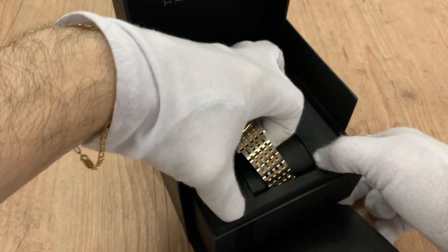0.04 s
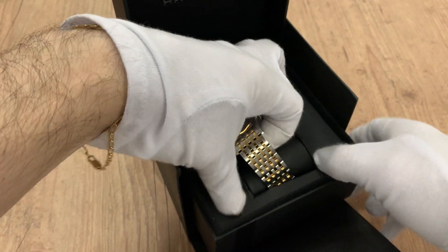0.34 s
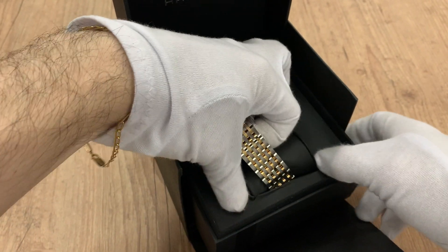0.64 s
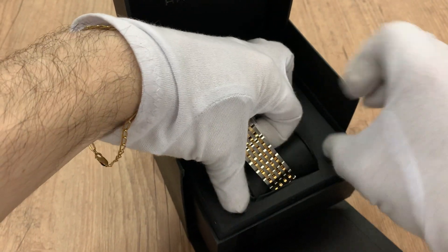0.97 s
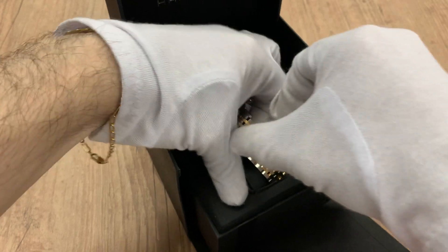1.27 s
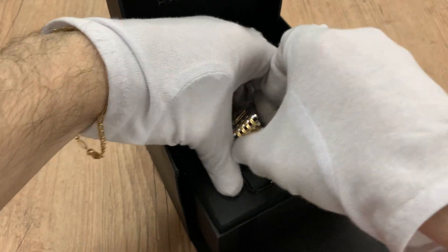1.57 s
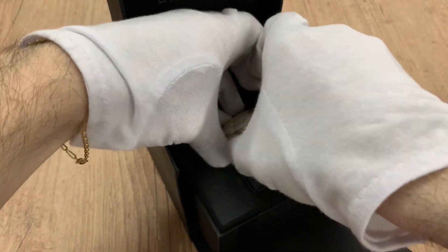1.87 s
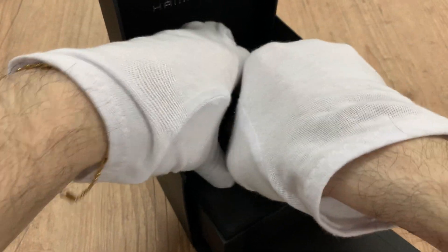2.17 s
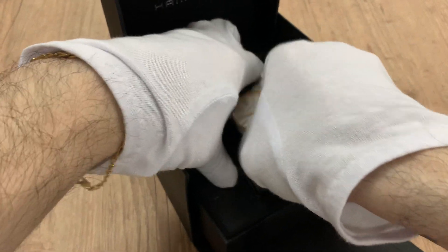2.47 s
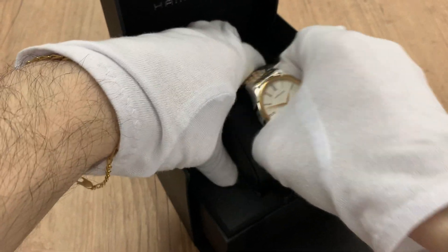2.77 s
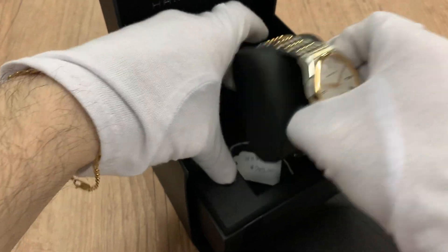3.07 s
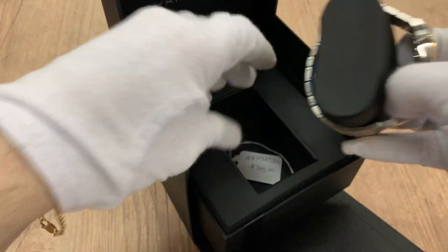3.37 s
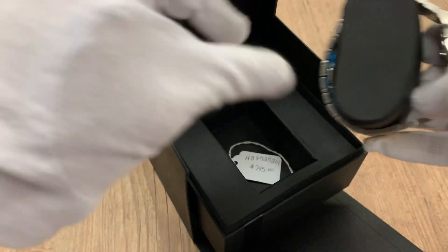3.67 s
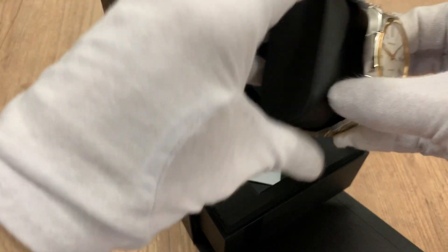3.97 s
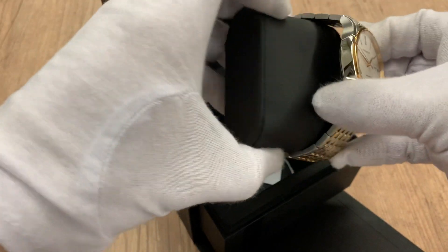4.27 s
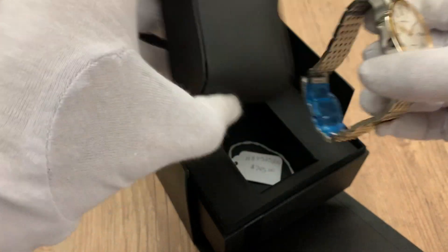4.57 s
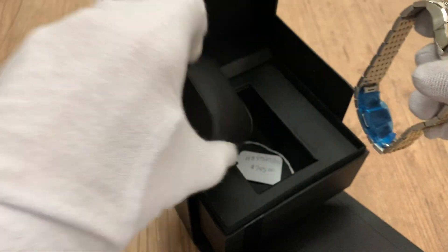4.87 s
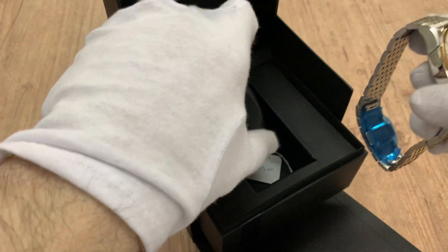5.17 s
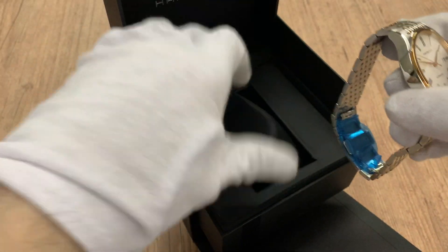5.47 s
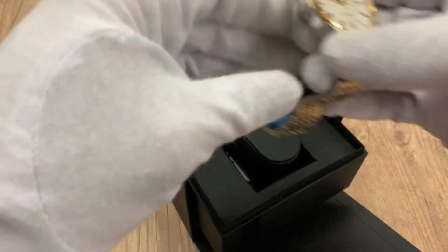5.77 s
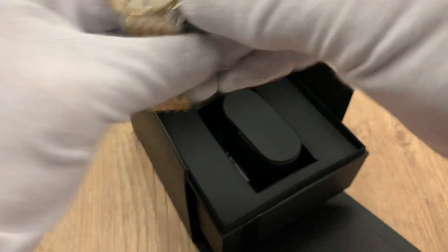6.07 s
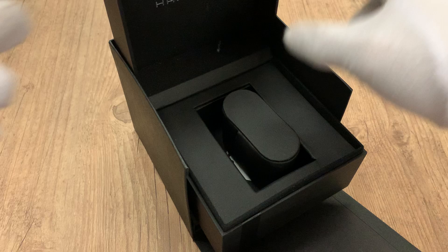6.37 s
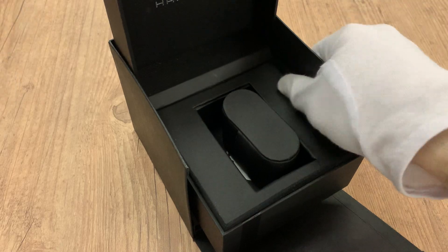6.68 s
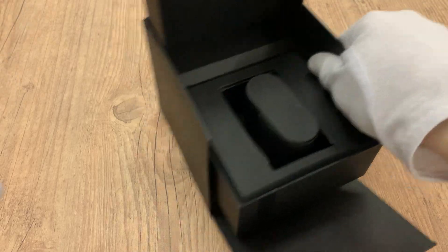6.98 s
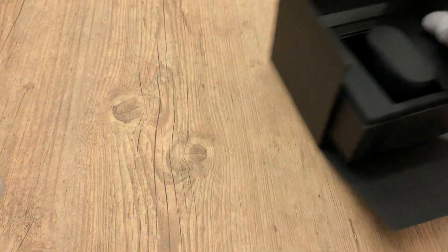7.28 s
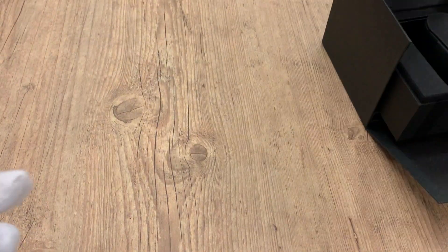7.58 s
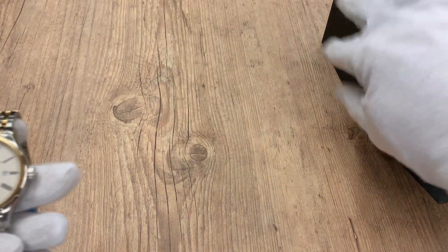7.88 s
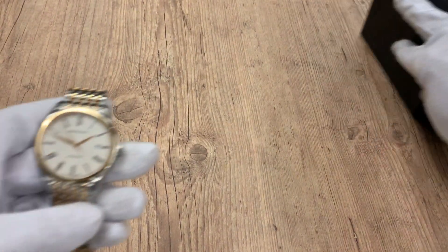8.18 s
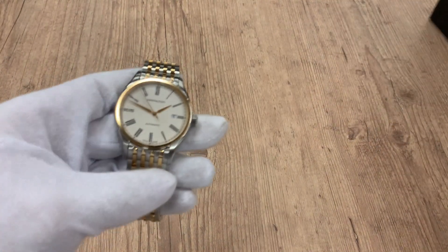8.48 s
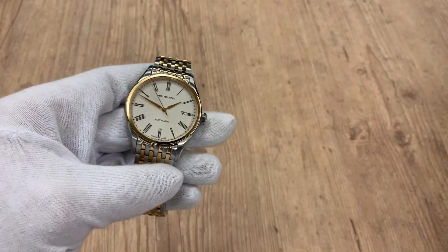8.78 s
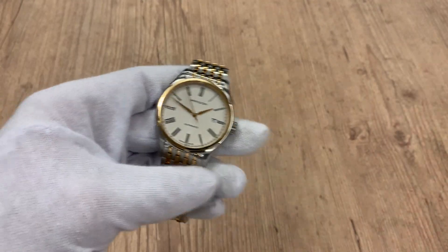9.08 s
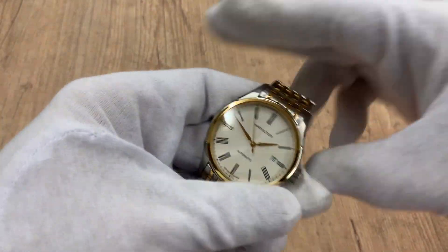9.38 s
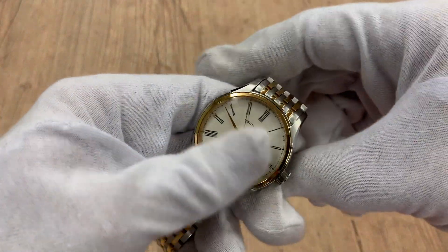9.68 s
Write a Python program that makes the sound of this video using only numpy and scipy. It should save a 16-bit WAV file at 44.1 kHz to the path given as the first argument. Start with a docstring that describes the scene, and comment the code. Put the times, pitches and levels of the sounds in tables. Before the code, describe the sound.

Close gloved handling of a watch and its box, with scrapes, taps and metal clicks, ending as the box is pushed away with a juddering drone.

```python
"""A quiet room, a wooden table, a phone's stereo microphone close to a stiff card box.
Gloved hands pull out a watch on its cushion: cotton catches and slips, the cushion scrapes free of its
well, the metal bracelet clacks and the cushion is dropped back in. The box is then pushed off to the
right in two slides; in the second its base grips and jumps, so it judders and the table drones.
Steady air noise and a faint appliance hum lie behind it all."""
import sys
import numpy as np
from scipy import signal
from scipy.fft import rfft, irfft
from scipy.io import wavfile
from scipy.ndimage import uniform_filter1d, map_coordinates

SR = 44100
rng = np.random.default_rng(int(sys.argv[2]) if len(sys.argv) > 2 else 0)


def materialize(psi):
    """Save the field psi as 16-bit PCM at rate SR to the path in sys.argv[1].

    A 1-D psi becomes a single channel; in a 2-D psi each row is a channel.
    """
    bounded = np.clip(np.atleast_2d(psi).T, -1, 1)
    quanta = np.round(bounded * 32767).astype(np.int16)
    wavfile.write(sys.argv[1], SR, quanta)


N = 429093
TIME = np.arange(N) / SR
RING_TIME = np.arange(SR // 4) / SR

# resonances of the card box: (frequency [Hz], width [Hz], level [dB])
BOX_MODES = [(126, 8, 7), (182, 35, 8), (236, 22, 7.5), (310, 40, 8), (476, 140, 1.5), (678, 67, -1),
             (799, 32, -5), (983, 98, -12), (1294, 123, -7), (1490, 37, -5), (1940, 330, -14),
             (2225, 140, -9), (2920, 600, -10), (3640, 87, -6.5)]
# hiss of cotton fibres: (frequency [Hz], level [dB])
FIBRE_SPECTRUM = [(2500, -20), (5000, 4), (6800, -3), (10000, -4), (13500, -9.5), (15500, -26)]
STROKE_SHAPE = dict(attack_s=.045, release_s=.07, sag_db_per_s=20)


def gloves_in_box():
    """Threads catch and let go against cushion and lining; the box lends them body."""
    # finger strokes: (start [s], length [s], rub [dB], fibre hiss [dB])
    strokes = [(0.0, .09, -55, -60), (0.11, .04, -62, -76), (0.3, .22, -60, -80), (0.38, .04, -64, -73),
               (0.53, .1, -55, -70), (0.65, .09, -61, -80), (0.86, .05, -62, -79), (0.97, .06, -59, -69),
               (1.14, .25, -57, -76), (1.41, .045, -51, -63), (1.5, .1, -60, -74), (1.6, .08, -54, -73),
               (1.73, .08, -53, -60), (1.82, .1, -58, -79), (1.94, .06, -52, -62), (2.0, .15, -50, -61),
               (2.195, .05, -50, -58.5), (2.26, .04, -54, -64), (2.385, .025, -55, -63),
               (2.5, .09, -47, -49.5), (2.64, .08, -60, -80), (2.74, .1, -52, -60), (2.845, .035, -52, -50),
               (2.91, .19, -53, -62), (3.12, .13, -58, -74), (3.27, .17, -60, -76), (5.39, .08, -57, -76),
               (6.73, .04, -62, -75), (6.785, .05, -60, -60)]
    # cotton on the lining: (frequency [Hz], level [dB])
    rub_spectrum = [(250, -8.5), (450, 4), (750, -3), (1350, -3.5), (2000, -8), (2800, -9), (3900, -7),
                    (5200, -13), (7000, -31), (10000, -37)]
    rub, hiss = play(strokes, **STROKE_SHAPE)
    weave = shaped(friction(rate=1300, spread_db=2.8), rub_spectrum) * undb(1.7 * walk(35))
    fibres = shaped(friction(rate=1400, spread_db=3.6), FIBRE_SPECTRUM) * undb(1.7 * walk(35))
    return rub * weave + undb(-2) * hiss * fibres


def gloves_on_watch():
    """Out in the open, cotton glides over metal and leather; single threads snag and snap."""
    # finger strokes: (start [s], length [s], rub [dB], fibre hiss [dB])
    strokes = [(1.22, .05, -60, -82), (3.505, .075, -54, -68), (3.78, .13, -63, -83),
               (3.92, .045, -56, -71), (3.98, .08, -58, -71), (4.125, .1, -52, -57.5),
               (4.25, .07, -60, -74), (4.315, .13, -54, -59), (4.48, .11, -59, -69), (4.65, .04, -59, -71),
               (4.73, .08, -58, -62), (5.005, .11, -59.5, -69), (5.235, .04, -66, -81),
               (5.39, .12, -61, -57.5), (5.8, .17, -77, -77), (5.96, .2, -75, -65), (6.05, .04, -66, -74),
               (9.4, .32, -80, -83)]
    # cotton on watch and cushion: (frequency [Hz], level [dB])
    rub_spectrum = [(600, -11), (1300, -1.5), (1900, -2.5), (2600, -5), (3100, 0), (3900, -1.5),
                    (4900, -3.5), (7000, -14), (11000, -29)]
    rub, hiss = play(strokes, **STROKE_SHAPE)
    weave = shaped(friction(rate=1200, spread_db=3.4), rub_spectrum)
    fibres = shaped(friction(rate=1400, spread_db=3.8), FIBRE_SPECTRUM)
    return (undb(-.5) * rub * weave + undb(.5) * hiss * fibres) * undb(walk(45))


def glove_zips():
    """Ribs of the weave tick past an edge at an uneven rate that follows the finger's speed."""
    # runs over an edge: (start [s], length [s], level [dB], pitch [Hz])
    runs = [(0.3, .08, -63, 3400), (0.85, .09, -61, 3300), (1.21, .08, -54, 2900), (1.59, .08, -57, 2500),
            (1.88, .1, -54, 2700), (2.09, .08, -54, 4400), (2.19, .06, -54, 5000), (3.5, .1, -51, 3200),
            (3.51, .08, -57, 1700), (3.76, .06, -60, 3000), (3.82, .05, -55, 1750), (3.9, .075, -48, 1850),
            (3.91, .12, -57, 3400), (4.12, .06, -55, 1550), (4.13, .11, -55, 3500), (4.73, .1, -57, 3700),
            (4.75, .07, -60, 5800), (5.04, .09, -58, 2600), (5.24, .05, -61, 3800)]
    width, arch = .125, .1  # bandwidth and mid-stroke rise, as shares of the pitch
    out = np.zeros(N)
    for start, length, db, hz in runs:
        speed = np.sin(np.linspace(0, np.pi, int(length * SR)))
        uneven = unit(lowpass(rng.standard_normal(len(RING_TIME)), hz * width))[:len(speed)]
        ribs = np.sin(phase_of(hz * (1 + arch * (speed - np.pi / 4))))
        add(out, start, speed * uneven * ribs, db + 5)
    return out


def glove_presses():
    """Under pressure the glove creeps in coarse slips that sound the box and rumble in the table."""
    # presses: (start [s], length [s], hollow rub [dB], rumble [dB])
    presses = [(0.02, .13, -50, -62), (0.39, .13, -52, -48), (0.53, .16, -53, -62), (0.98, .11, -49, -47),
               (1.29, .06, -50, -46), (1.37, .16, -48, -57), (1.6, .3, -52, -62), (2.03, .27, -52, -52),
               (2.44, .25, -47, -55), (2.8, .24, -47, -53), (3.06, .19, -50, -53), (4.35, .09, -51, -56),
               (5.0, .08, -52, -60), (5.39, .06, -50, -60), (5.6, .16, -57, -48), (8.15, .2, -58, -50)]
    hollow, rumble = play(presses, attack_s=.025, release_s=.1, sag_db_per_s=15)
    slips = friction(rate=500, spread_db=2.5) * undb(1.5 * walk(40))
    card = through(slips, ring(damped(BOX_MODES)))
    card = unit(highpass(lowpass(card, hz=1200), hz=400))
    table = shaped(slips, [(25, -12), (55, 0), (130, 0), (220, -9), (400, -26), (1500, -60)])
    return undb(-2.5) * (hollow * card + rumble * table)


def cushion():
    """The tight cushion sticks and slips along its well until a tug frees it with a bright rasp."""
    # spells of creeping: (start [s], length [s], level [dB])
    drags = [(1.98, .38, -56), (2.78, .21, -46.5), (3.0, .2, -54.5)]
    # scrape on the walls: (frequency [Hz], level [dB])
    wall_spectrum = [(120, -12), (250, 0.5), (450, 0), (700, 3.5), (1050, -3.5), (1400, -0.5), (2100, -7.5),
                     (2800, -18.5), (4400, -9.5), (6000, -15.5), (10000, -19), (13500, -29), (15500, -45)]
    # resonances of the well: (frequency [Hz], width [Hz], level [dB])
    well_modes = [(330, 150, -1), (673, 60, 0), (1380, 80, -1), (1970, 120, -6), (3700, 400, -15),
                  (5400, 900, -21)]
    # rasp of the lining: (frequency [Hz], level [dB])
    lining_spectrum = [(900, -18), (2000, 1), (2500, -3), (3300, 0), (4300, -8), (5500, -7), (10000, -12),
                       (14000, -17)]
    tug_s, free_s, slip_s = 2.445, 2.54, .04
    strain_db_per_s, rasp_db_per_s, let_go_db_per_s = 240, 140, 900
    slips = friction(rate=1600, spread_db=2) * undb(1.5 * walk(70))
    walls = undb(-6.5) * shaped(slips, wall_spectrum) + undb(-7) * through(slips, ring(well_modes))
    lining = shaped(friction(rate=6000, spread_db=1.5), lining_spectrum)
    creep, = play(drags, attack_s=.07, release_s=.12, sag_db_per_s=10)
    # the tug grows with the strain, holds while the cushion slips out, then falls away
    until_free = np.clip(free_s - TIME, 0, 1)
    let_go_db = let_go_db_per_s * np.clip(TIME - free_s - slip_s, 0, 1)
    tug = undb(-29 - strain_db_per_s * until_free - let_go_db)
    onset = np.clip((TIME - tug_s) / .01, 0, 1)
    rasp = onset * undb(-39.5 - rasp_db_per_s * until_free - let_go_db)
    return (creep + tug) * walls + rasp * lining


def box_knocks():
    """Each blow cracks, rings the box modes near its centre, crunches the lining and thuds the table."""
    # knocks on the box from fingers, cushion, and its base jumping on the table:
    # (time [s], level [dB], centre [Hz], crunch length [s], thud [dB])
    blows = [(0.103, -27.5, 290, 0.015, -55), (0.145, -39, 330, 0.02, -41), (0.306, -43.5, 700, 0.017, -62),
             (0.39, -31, 270, 0.043, -32), (0.738, -40.5, 1400, 0.015, -58), (0.971, -27, 1020, 0.06, -40),
             (1.03, -34, 750, .03, -38), (1.074, -40.5, 540, 0.13, -53), (1.294, -29, 260, 0.02, -32.5),
             (1.448, -25, 700, 0.025, -47), (2.008, -39, 330, 0.03, -52), (2.085, -39, 480, .03, -58),
             (2.15, -40, 520, .05, -58), (2.367, -42, 704, .03, -61), (2.44, -32, 480, 0.03, -57),
             (2.459, -30.5, 650, 0.03, -55), (2.472, -34, 850, .02, -60), (2.503, -31, 320, .05, -54),
             (2.528, -25, 520, 0.05, -46), (2.536, -23, 520, .05, -44), (2.553, -18.5, 1200, 0.07, -44),
             (2.582, -25.5, 700, .03, -52), (2.918, -32.5, 900, .02, -43.5), (2.942, -30.5, 950, .02, -44),
             (3.101, -32, 850, 0.04, -46), (3.197, -31.5, 700, 0.05, -42), (4.346, -36, 560, .06, -52),
             (4.382, -39, 750, .04, -58), (5.553, -25.5, 520, 0.06, -34.5), (5.602, -24, 1400, 0.013, -33),
             (5.605, -21.5, 400, 0.012, -34), (5.613, -31, 1100, .02, -50), (6.627, -41, 620, .04, -62),
             (6.64, -41, 680, .06, -60), (6.758, -45, 550, 0.036, -52), (6.921, -36.5, 650, 0.04, -58),
             (6.976, -27, 367, 0.02, -56), (6.977, -29, 2300, .015, -62), (7.971, -34, 750, 0.03, -62.5),
             (7.993, -31.5, 1500, 0.03, -59), (8.522, -15.5, 1200, 0.03, -44),
             (8.528, -16, 138, 0.023, -28), (8.569, -16, 1550, 0.012, -49), (8.601, -21, 900, .06, -36),
             (8.649, -24, 800, .02, -50)]
    # low resonances of the table: (frequency [Hz], width [Hz], level [dB])
    thud_modes = [(34.5, 8, -2), (63.7, 11, 6), (113, 17, 2)]
    out, thud = np.zeros(N), ring(thud_modes)
    rise = 1 - np.exp(-RING_TIME / .0008)  # a blow takes a moment to build
    for start, db, centre_hz, crunch_s, thud_db in blows:
        modes = [(hz, width, mode_db - 7 * np.log2(hz / centre_hz) ** 2)
                 for hz, width, mode_db in damped(BOX_MODES)]
        force = signal.unit_impulse(len(RING_TIME)) + 1.1 * burst(crunch_s)
        body = unit(through(force, ring(modes)))
        crack = unit(highpass(lowpass(burst(t60=.026), 1.65 * centre_hz), .5 * centre_hz))
        add(out, start, rise * (body + .35 * crack), db)
        add(out, start, thud, thud_db - .5)
    return out


def bracelet():
    """Links snap together in a quick run, damped by the glove that holds them."""
    # the bracelet slipping off the cushion: (time [s], level [dB], brightness [Hz])
    clacks = [(4.3443, -21, 1800), (4.3505, -24.5, 4500), (4.3585, -32, 2000), (4.3618, -19, 7000),
              (4.3743, -24.5, 3500), (4.382, -35, 2500), (4.392, -38, 2000), (4.404, -36, 2000)]
    # resonances of the links: (frequency [Hz], width [Hz], level [dB])
    link_modes = [(915, 90, 3), (1315, 130, 16.5), (1560, 150, 14.5), (1850, 270, 12), (2230, 220, -2),
                  (2860, 310, -8), (3760, 420, 7.5), (7750, 700, -17), (10400, 1200, -12)]
    out, links = np.zeros(N), ring(damped(link_modes))
    for start, db, bright_hz in clacks:
        snap = links + .51 * burst(t60=.007)
        add(out, start, highpass(lowpass(snap, bright_hz, order=1), hz=600), db + 2.5)
    return out


def edge_ticks():
    """Hard little contacts of links and edges die within milliseconds."""
    # contacts: (time [s], level [dB])
    ticks = [(0.5736, -40), (0.6045, -34), (0.738, -44), (1.4254, -44), (2.4054, -40), (2.4377, -34),
             (2.459, -29), (2.8644, -36), (2.8737, -24), (3.199, -38), (4.1434, -39), (4.51, -37),
             (4.591, -37), (6.1165, -46), (6.638, -49), (6.9426, -29.5), (6.977, -17), (7.362, -22.5),
             (7.5702, -42.5), (8.5235, -26), (8.8174, -37), (8.8438, -33), (8.9067, -23)]
    # one hard contact: (frequency [Hz], level [dB])
    tick_spectrum = [(800, -37), (2500, -2), (5000, 0), (10000, -3.5), (15000, -18)]
    out = np.zeros(N)
    for start, db in ticks:
        add(out, start, colour(burst(t60=.02), tick_spectrum), db - 9.5)
    return out


def slide(speed, grit_spectrum, grit_db, panel_db):
    """Card catches on the wood grain; the hollow panels answer even at low speed, the grit needs more."""
    # resonances of the box panels: (frequency [Hz], width [Hz], level [dB])
    panel_modes = [(325, 33, -6), (472, 30, 4), (624, 20, 1), (1262, 48, -1), (1645, 70, -13),
                   (2000, 110, -11), (2260, 70, -9), (2880, 90, -16), (3260, 100, -16), (4000, 90, -19)]
    slips = friction(rate=2600, spread_db=2.2) * undb(.8 * walk(130))
    grit = shaped(slips, grit_spectrum)
    panels = through(friction(rate=7000, spread_db=1.2), ring(panel_modes))
    panels = wander(panels, depth_s=.00016, rate=18)
    return undb(grit_db) * speed * grit + undb(panel_db) * speed ** .88 * panels


def box_slides():
    """A hand pushes the box over the table twice, speeding up and braking each time."""
    # card on wood, first push: (frequency [Hz], level [dB])
    first_spectrum = [(120, -41), (200, -24), (326, -3.5), (405, -11), (467, -10.5), (800, -15),
                      (1070, -15), (1280, -6), (1520, -13), (3100, -18.5), (5000, -23), (6500, -29.5),
                      (10300, -32.5), (13700, -37), (15000, -61)]
    # card on wood, second push: (frequency [Hz], level [dB])
    second_spectrum = [(120, -48), (200, -20), (248, -14), (624, -4.5), (789, -12), (1260, -13),
                       (1460, -16), (2130, -12), (2800, -19), (4160, -21.5), (6500, -30), (10500, -34.5),
                       (13500, -37.5), (15000, -63)]
    first_speed, = play([(6.895, .41, 0)], attack_s=.37, release_s=.43, sag_db_per_s=4)
    second_speed, = play([(8.045, .8, 0)], attack_s=.13, release_s=.28, sag_db_per_s=9)
    first = slide(first_speed, first_spectrum, grit_db=-38.2, panel_db=-39.5)
    second = slide(second_speed, second_spectrum, grit_db=-42, panel_db=-45)
    return first + second


def box_judder():
    """The base grips and jumps about 63 times a second: the table drones, the box chatters and sings."""
    # bouts of juddering: (start [s], length [s], drone [dB], chatter [dB], singing [dB], rasp [dB])
    bouts = [(8.519, .012, -19.5, -27.5, -30, -39), (8.566, .046, -19, -27.5, -20.5, -40),
             (8.635, .05, -20.5, -33, -26.5, -44), (8.705, .035, -27, -41, -26.5, -51),
             (8.76, .025, -24.5, -45, -29, -55), (8.792, .075, -26.5, -38, -21.5, -54),
             (8.885, .03, -35, -48, -34, -60)]
    # resonances of the table top: (frequency [Hz], width [Hz], level [dB])
    table_modes = [(100, 26, -7.5), (142, 9, 4), (192, 18, -6), (272, 22, -2.5), (314, 16, 4), (350, 22, 0),
                   (385, 22, 1), (478, 20, -6)]
    # chatter of the box: (frequency [Hz], level [dB])
    chatter_spectrum = [(290, -28), (500, 0), (530, -12), (600, -5.5), (701, -14), (841, -5), (935, -1),
                        (1050, -6), (1200, -11), (1360, -9), (2000, -21), (2650, -26), (2860, -33.5),
                        (5000, -49), (6500, -70), (11000, -120)]
    # rasp of its base: (frequency [Hz], level [dB])
    rasp_spectrum = [(700, -20), (1150, 0), (1750, 1), (2200, -7), (2800, -10), (4000, -25), (7000, -42)]
    drone_gain, chatter_gain, sing_gain, rasp_gain = (
        play(np.array(bouts)[:, [0, 1, column]], attack_s=.008, release_s=.34, sag_db_per_s=sag, order=1)[0]
        for column, sag in enumerate((36, 72, 34, 72), start=2))
    cycles = np.cumsum(63 * (1 + .085 * walk(60))) / SR
    jumps = unit(np.diff(np.floor(cycles), prepend=0) * undb(1.8 * walk(60)))
    contact = .5 + np.exp(-(cycles % 1) / .35)  # the base keeps scraping between jumps
    grind = unit(contact * friction(rate=7000, spread_db=1))
    drone = wander(through(jumps + .5 * grind, ring(table_modes)), depth_s=.0005, rate=22)
    drone = unit(highpass(lowpass(drone, hz=517, order=4), hz=76.6, order=4))
    chatter = shaped(grind + .25 * jumps, chatter_spectrum)
    rasp = shaped(contact * friction(rate=7000, spread_db=1.2), rasp_spectrum)
    singing = singing_mode(cycles, start_s=bouts[0][0])
    return (undb(-4) * drone_gain * drone + undb(-3) * chatter_gain * chatter
            + undb(-1.5) * sing_gain * singing + undb(-1) * rasp_gain * rasp)


def singing_mode(jump_cycles, start_s):
    """Friction feeds one mode, which throbs with the jumps and sinks, faster once the box brakes."""
    start_hz, sink_hz_per_s, brake_s, brake_hz_per_s = 366, 58, 8.87, 230
    sink_hz = sink_hz_per_s * np.maximum(TIME - start_s, 0)
    brake_hz = brake_hz_per_s * np.maximum(TIME - brake_s, 0)
    phase = phase_of(start_hz - sink_hz - brake_hz + 5 * walk(25))
    partner = undb(-9) * np.sin(.9 * phase)  # a weaker mode just below beats against it
    throb = 1 + .38 * np.cos(2 * np.pi * jump_cycles)
    return unit((np.sin(phase) + partner) * throb)


def rubbing():
    """Everything that slides: box, gloves and cushion, with fresh slips on every call."""
    return box_slides() + gloves_in_box() + gloves_on_watch() + glove_zips() + glove_presses() + cushion()


def rubbing_width():
    """This close to a wide contact area, the two microphone ports also hear different slips."""
    # side against mid: (frequency [Hz], level [dB])
    side_spectrum = [(100, -19), (400, -14), (1200, -10.5), (2400, -0.5), (4400, -4), (12000, -9)]
    side = undb(-10.5) * colour(rubbing(), side_spectrum)
    return np.array([side, -side])


def judder_width(x):
    """A delayed copy, opposite in the two channels, makes the judder sound wide."""
    side = undb(-3) * np.interp(TIME - .0017, TIME, highpass(x, hz=560))
    return np.array([side, -side])


def direct_sound(x):
    """Small differences of time and level at the ports set the hands left, then take the box right."""
    # positions: (time [s], delay of the left port [ms], left minus right [dB])
    places = [(1.0, -.1, .3), (2.2, -.11, .8), (2.55, -.11, 3), (3.1, -.09, .3), (4.4, -.09, 2),
              (5.6, -.1, .3), (7.2, .05, -.4), (8.2, .2, -1.5), (8.6, .22, .2)]
    times, delays_ms, pans_db = np.transpose(places)
    lag = np.interp(TIME, times, delays_ms) * SR / 1000
    pan_db = np.interp(TIME, times, pans_db)
    return np.array([map_coordinates(x, [np.arange(N) - side * lag], order=3) * undb(side * pan_db)
                     for side in (.5, -.5)])


def reflections(x, db):
    """Early reflections from hands and table, different at each port."""
    tint = [(100, -12.5), (400, 4.5), (1200, -7), (3000, 6), (12000, 0)]
    return undb(db) * np.array([through(x, colour(burst(t60=.032), tint)) for _ in range(2)])


def room_tail(x, db, t60):
    """The short tail of a furnished room."""
    tint = [(100, -11.5), (350, 0), (2000, -1), (6000, -1.5), (14000, -9)]
    build_up = 1 - np.exp(-RING_TIME / .0027)
    return undb(db) * np.array([through(x, colour(burst(t60), tint) * build_up) for _ in range(2)])


def room_tone():
    """Steady air noise, alike on both sides in the bass, with the faint wavering hum of an appliance."""
    # air in the room: (frequency [Hz], level [dB])
    air_spectrum = [(13, -51), (22, -55), (44, -6), (89, -11.5), (124, -1.5), (182, -7), (220, -7.5),
                    (253, -1.5), (275, -8), (371, -13), (414, -21), (643, -20), (2330, -38), (4300, -44),
                    (5600, -54), (13900, -61), (15500, -77)]
    # partials of the hum: (frequency [Hz], level [dB])
    hum_partials = [(59.2, -60.5), (140.0, -69), (188.4, -54.5), (253.0, -60.5), (441.4, -75),
                    (629.8, -72.5)]
    mid = colour(rng.standard_normal(N), air_spectrum)
    side = colour(rng.standard_normal(N), air_spectrum)
    side = colour(side, [(60, -16.5), (250, -9.5), (600, 3.5), (1500, 1), (6000, 1)])
    hum = sum(undb(db + 1.5 + 2 * walk(2.5)) * np.sin(phase_of(hz + 1.51 * walk(8)))
              for hz, db in hum_partials)
    return undb(-51) * np.array([mid + side, mid - side]) / mid.std() + hum


def friction(rate, spread_db):
    """Tiny slips at random moments, about `rate` a second, a few larger than the rest."""
    slips = np.zeros(N)
    at = np.flatnonzero(rng.random(N) < rate / SR)
    sizes = undb(spread_db * np.minimum(rng.exponential(size=len(at)), 4))
    slips[at] = sizes * rng.choice([-1, 1], len(at))
    return unit(slips)


def ring(modes):
    """Impulse response of (Hz, width, dB) modes with energy 1; neighbours swing in opposite senses."""
    t = RING_TIME
    response = sum((-1) ** k * undb(db) * width * np.exp(-np.pi * width * t) * np.sin(2 * np.pi * hz * t)
                   for k, (hz, width, db) in enumerate(modes))
    return response / np.linalg.norm(response)


def damped(modes):
    """A held object is lossy: no mode has a Q above 10."""
    return [(hz, max(width, hz / 10), db) for hz, width, db in modes]


def wander(x, depth_s, rate):
    """Let resonances drift slightly as the load on them shifts."""
    return map_coordinates(x, [(TIME + depth_s * walk(rate)) * SR], order=1, mode="mirror")


def burst(t60):
    """Noise with energy 1 that falls 60 dB in t60 seconds."""
    noise = rng.standard_normal(len(RING_TIME)) * np.exp(-np.log(1000) * RING_TIME / t60)
    return noise / np.linalg.norm(noise)


def walk(rate):
    """Random drift with rms 1 and `rate` new values a second."""
    step = max(int(SR / rate), 1)
    held = np.repeat(rng.standard_normal(N // step + 1), step)
    return unit(uniform_filter1d(held, step)[:N])


def play(events, attack_s, release_s, sag_db_per_s, order=2):
    """A gain track per dB column of (start, length, dB, ..) events; order 2 brakes, order 1 rings out."""
    tracks = np.zeros((len(events[0]) - 2, N))
    for start, length, *levels in events:
        t = np.arange(int((length + release_s) * SR)) / SR
        swell = np.sin(np.pi / 2 * np.minimum(t / attack_s, 1))
        fall = (np.maximum(t - length, 0) / release_s) ** order
        shape = swell * undb(-sag_db_per_s * t - 60 * fall)
        for track, db in zip(tracks, levels):
            add(track, start, shape, db)
    return tracks


def add(track, start_s, sound, db):
    """Place a sound at a time and a peak level."""
    i = max(int(start_s * SR), 0)
    track[i:i + len(sound)] += (undb(db) * sound / np.abs(sound).max())[:N - i]


def colour(x, points, size=4096):
    """Minimum-phase filter with a (Hz, dB) spectrum."""
    hz, db = np.transpose(points)
    bins = np.maximum(np.arange(size // 2 + 1), .5) * SR / size
    gain = undb(np.interp(np.log(bins), np.log(hz), db))
    cepstrum = irfft(np.log(gain))
    cepstrum[1:size // 2] *= 2
    cepstrum[size // 2 + 1:] = 0
    return through(x, irfft(np.exp(rfft(cepstrum))))


def shaped(x, points):
    """Colour a sound and scale it to rms 1."""
    return unit(colour(x, points))


def through(x, response):
    """Pass a sound through an impulse response."""
    return signal.oaconvolve(np.float32(x), np.float32(response))[:len(x)]


def lowpass(x, hz, order=2):
    """Dull the treble, as a softer contact does."""
    return signal.sosfilt(signal.butter(order, hz, fs=SR, output="sos"), x)


def highpass(x, hz, order=2):
    """Thin the bass, as a small surface does."""
    return signal.sosfilt(signal.butter(order, hz, "high", fs=SR, output="sos"), x)


def phase_of(hz):
    """Running phase of a changing frequency."""
    return 2 * np.pi * np.cumsum(hz) / SR


def undb(db):
    """Decibels to gain."""
    return np.exp(np.log(10) / 20 * np.asarray(db))


def unit(x):
    """Scale to rms 1."""
    return x / np.sqrt(np.mean(x ** 2))


def scene():
    """Handling close to the microphone, then the box moving off; the judder hangs longest in the room."""
    hits = box_knocks() + bracelet() + edge_ticks()
    rubs = rubbing()
    judder = box_judder()
    early = reflections(hits, db=-9.5) + reflections(highpass(judder, hz=900), db=-1.5)
    tail = room_tail(undb(.5) * rubs + hits, db=-6.5, t60=.33) + room_tail(judder, db=-12, t60=.5)
    width = rubbing_width() + judder_width(judder)
    return direct_sound(rubs + hits + judder) + early + tail + width + room_tone()


def record(dry):
    """The phone gives both channels the same upper treble, a little later on the left, and cuts the top."""
    shared_from_hz, left_delay_s, top_hz = 5900, .00029, 15400
    hz = np.arange(N // 2 + 1) * SR / N
    shared = np.clip((hz - shared_from_hz) / 600, 0, 1)
    left, right = rfft(dry)
    late_right = right * np.exp(-2j * np.pi * hz * left_delay_s)
    left = np.sqrt(1 - shared) * left + np.sqrt(shared) * late_right
    top_cut = signal.ellip(8, .2, 70, top_hz, fs=SR, output="sos")
    return signal.sosfilt(top_cut, irfft(np.array([left, right]), N))


dry = scene()
out = record(dry)
materialize(out)
```